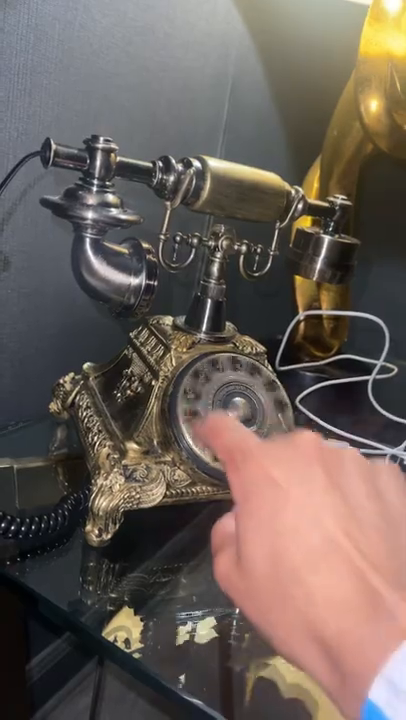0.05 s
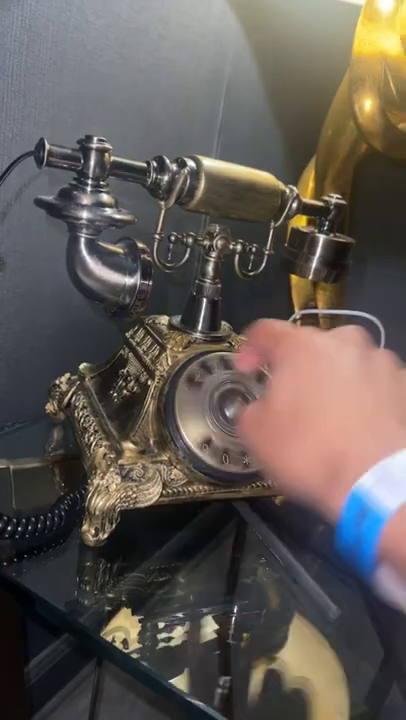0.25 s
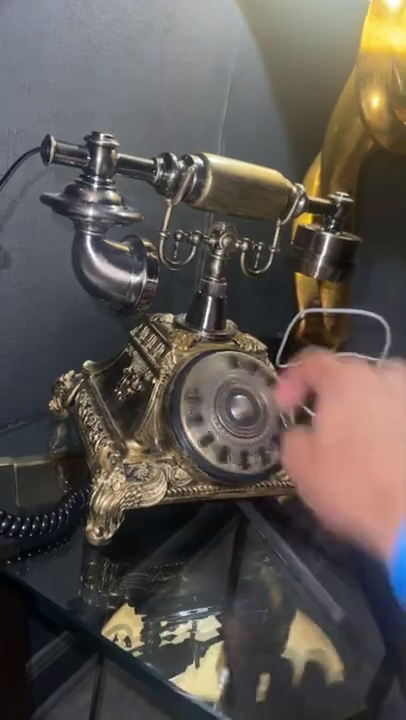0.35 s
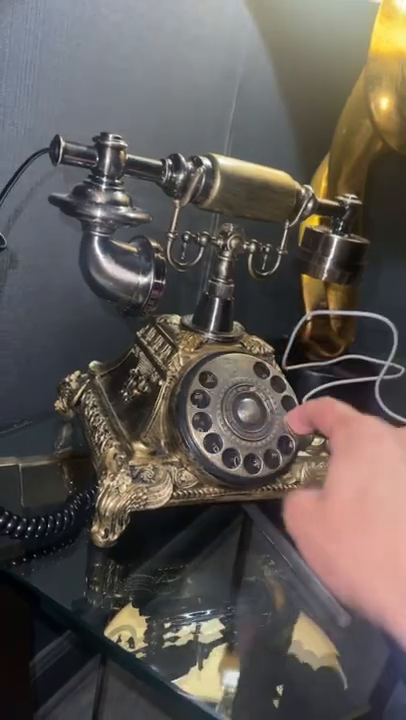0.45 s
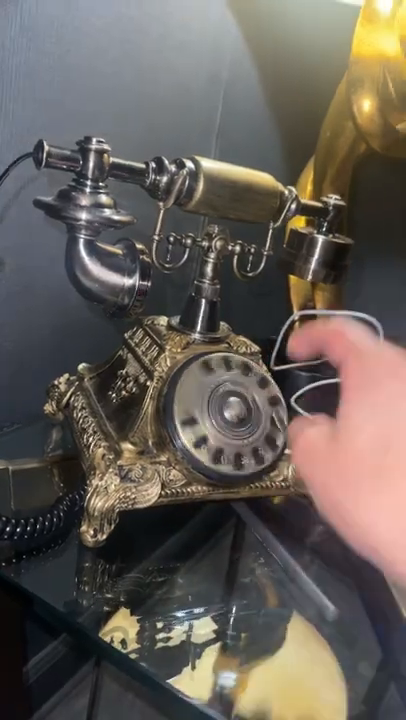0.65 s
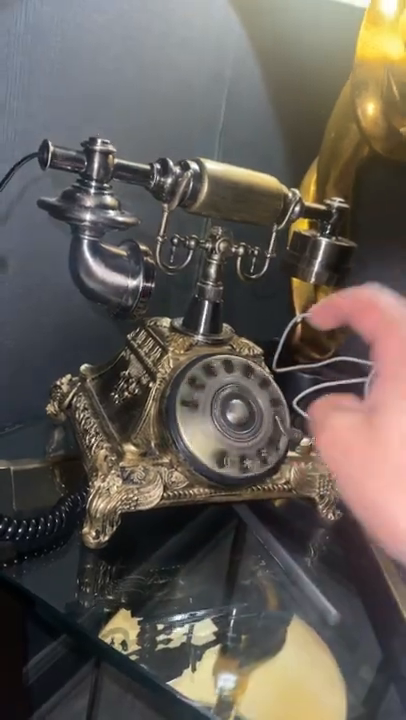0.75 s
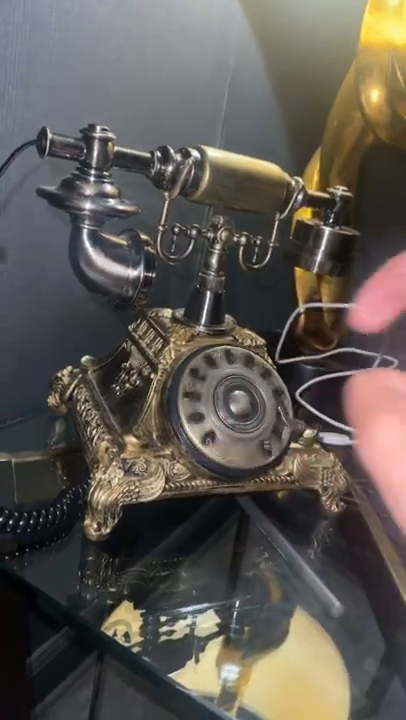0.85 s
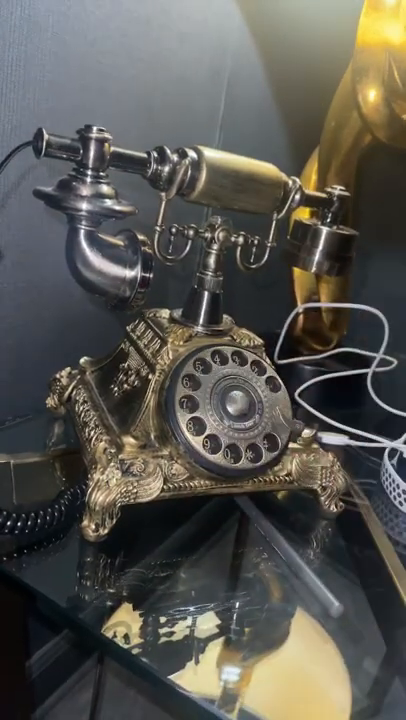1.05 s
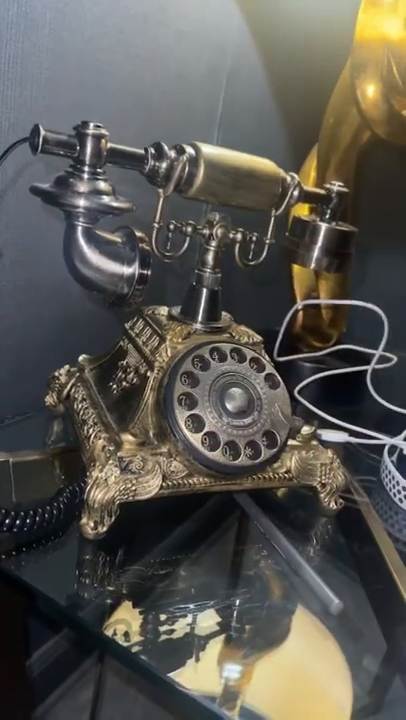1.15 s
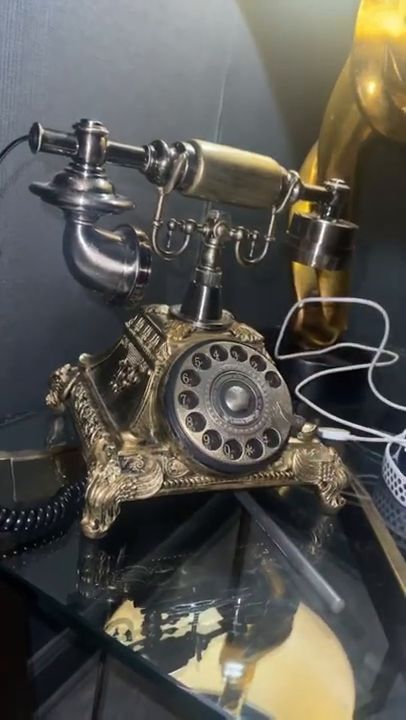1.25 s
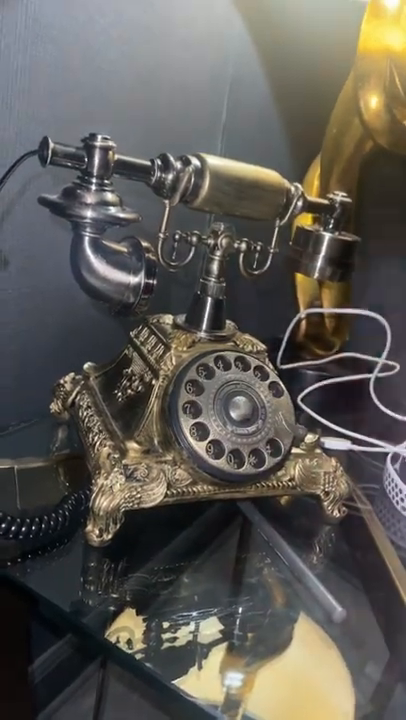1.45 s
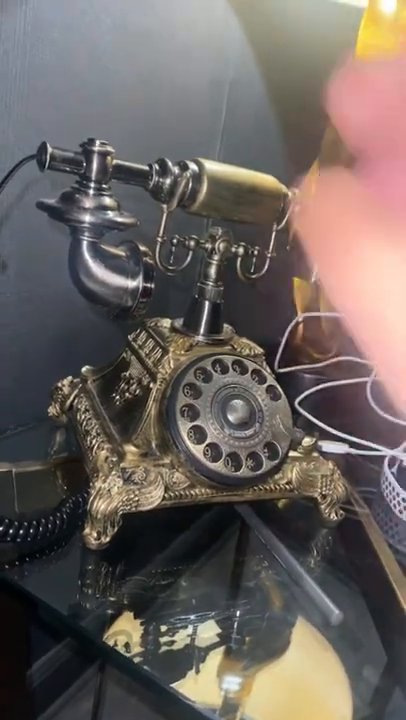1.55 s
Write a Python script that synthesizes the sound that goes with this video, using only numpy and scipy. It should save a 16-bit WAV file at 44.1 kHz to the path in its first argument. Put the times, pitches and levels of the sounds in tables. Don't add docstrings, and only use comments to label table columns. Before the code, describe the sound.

A rotary telephone dial, heard close in a quiet room with low room tone and a faint fading metal ring. From 0.1 to 0.5 seconds a finger winds it, gritty rubbing and irregular clicks swelling, then easing. After a near-silent gap, at 0.63 it whirs back louder, rapid teeth rattling in a hollow metal case over a faint low table drumming. It stops around 1.1, settling by 1.24 as thin, high brass ringing fades.

```python
import sys
import numpy as np
from scipy import signal
from scipy.fft import rfft, irfft
from scipy.io import wavfile
from scipy.ndimage import map_coordinates

SR = 44100
rng = np.random.default_rng(int(sys.argv[2]) if len(sys.argv) > 2 else 0)


def volts_from_db(level):
    exponent = np.asarray(level, float) / 20
    return 10 ** exponent


def persist_wave(psi):
    counts = np.round(np.clip(psi, -1, 1) * 32767).astype(np.int16)
    wavfile.write(sys.argv[1], SR, np.atleast_2d(counts).T)


N = 70560
T_S = np.arange(N) / SR

# (time [s], effort [dB], brightness [dB])
WIND = [
    (.084, -62, 13),
    (.092, -50, -1),
    (.19, -37, -9),
    (.26, -28.5, -4.5),
    (.36, -23.5, -7.5),
    (.47, -26.5, -6.5),
    (.495, -31.5, 5),
    (.512, -48.5, -9.5),
    (.6, -61.5, -14),
]
# (time [s], effort [dB], brightness [dB])
BACK = [
    (0.624, -46, -16),
    (0.643, -26, -5.5),
    (.67, -25, 1),
    (0.748, -22, 1),
    (.88, -21, 1),
    (.93, -25, 3),
    (1., -22, 1.5),
    (1.06, -21.5, -0.5),
    (1.112, -23, 3),
]
# (time [s], effort [dB], brightness [dB])
SETTLE = [
    (1.143, -26.5, -23.5),
    (1.152, -30.5, -19),
    (1.213, -39, -19),
    (1.238, -95, -16),
]
MOVE_START_S, MOVE_END_S = WIND[0][0], SETTLE[-1][0]


def unit(x):
    return x / np.sqrt(np.mean(x ** 2) + 1e-20)


def along(points, hz):
    f, v = np.transpose(points)
    return np.interp(np.log(hz + 1), np.log(f + 1), v)


def wobble(rate_hz):
    return map_coordinates(rng.standard_normal(400), [np.arange(N) * min(rate_hz, 200) / SR])


def causal(gain):
    cepstrum = irfft(np.log(gain(np.fft.rfftfreq(8192, 1 / SR)) + 1e-6))
    cepstrum[1:4096] *= 2
    cepstrum[4097:] = 0
    h = irfft(np.exp(rfft(cepstrum)))[:4096]
    return h / np.linalg.norm(h)


def through(x, h):
    return signal.fftconvolve(x, h)[:N]


def modes(partials, t):
    return sum(volts_from_db(db - 60 * t / t60) * np.sin(2 * np.pi * hz * t) for hz, db, t60 in partials)


def control(column):
    rows = np.array(list(WIND) + list(BACK) + list(SETTLE))
    return np.interp(T_S, rows[:, 0], rows[:, column])


def air():
    # (frequency [Hz], level [dB])
    tone_shape = [(24, -32), (40, 0.5), (346, -9.5), (554, -20.5), (746, -13.5), (1000, -19), (1080, -18),
                  (1170, -19.5), (15000, -74)]
    tone = through(rng.standard_normal(N + 4096), causal(lambda f: volts_from_db(along(tone_shape, f))))
    return volts_from_db(-50.5 + .8 * wobble(6.6)) * unit(tone)


def earlier_ring():
    # (frequency [Hz], level [dB], t60 [s])
    partials = [(3050, -64, 0.2), (3230, -68, .15), (4450, -70, 0.2), (4620, -64, .2), (5240, -72, 0.15),
                (7660, -70, 0.12)]
    return modes(partials, T_S)


def earlier_hiss():
    level_db, t60_s = -62, 0.19
    return volts_from_db(level_db - 60 * T_S / t60_s) * rng.standard_normal(N)


def rubbing():
    grains_per_s, spread_db = 6000, 5
    flutter_db, case_flutter_db = .8, 1.4
    dull_db, bright_db = -2.5, -6.5
    draw = rng.standard_normal((2, N))
    size = volts_from_db(spread_db * np.clip(draw[1], -2, 2))
    grit = unit((rng.random(N) < grains_per_s / SR) * np.sign(draw[0]) * size)
    moving = (T_S > MOVE_START_S) * (T_S < MOVE_END_S)
    force = grit * volts_from_db(control(column=1) + flutter_db * wobble(78)) * moving
    dull = volts_from_db(dull_db + case_flutter_db * wobble(120)) * force
    return dull, volts_from_db(bright_db + control(column=2)) * force


def contacts():
    # (time [s], peak [dB], body [dB], snap [dB], sharp edge [dB])
    pawl = [(0.0869, -29.5, 2, 9, -13.5), (0.138, -28, -2.5, 14, -15), (0.1544, -36, 9, 0.5, -10),
            (0.172, -30, 8, 0, -10), (0.1915, -34.5, 18.5, 2, -17), (0.2029, -28.5, 4.5, 0, -16),
            (0.2095, -23.5, 17, 24, -6.5), (0.2144, -25.5, -1.5, 8, -5), (0.218, -22, 8, 2, -13.5),
            (0.2494, -27, 2.5, -1, -14.5), (0.2557, -15.5, 5, -1.5, -17.5), (0.2616, -20.5, 8.5, 0.5, 3.5),
            (0.268, -28.5, -1, 0.5, 3), (0.283, -27, 3, 0.5, -18.5), (0.29, -20.5, 7, -2, -12),
            (0.2975, -11.5, -5.5, 4, -6), (0.3055, -19, -3, -0.5, 0), (0.3284, -29, 7, 2.5, -8.5),
            (0.348, -23.5, -1.5, -1, 6.5), (0.3547, -14.5, -1, -2, 3), (0.365, -6, -9, -3.5, -18.5),
            (0.3727, -18, -3.5, 6.5, -0.5), (0.3846, -15, -3, -2, -4), (0.3953, -14, -5.5, 3, 0.5),
            (0.402, -14, 5.5, -3.5, 0.5), (0.411, -22, 4, 1.5, 6), (0.4226, -28.5, 8, 1, -1.5),
            (0.4304, -16.5, 6.5, 2.5, -1), (0.445, -26.5, -6.5, 1.5, 11), (0.4505, -23.5, -1, -1.5, -1.5),
            (0.463, -11.5, 7.5, 5, 1.5), (0.4745, -21, -0.5, -5.5, -6.5), (0.484, -22.5, 13.5, -2, -11),
            (0.497, -19, 11, 3, -7.5), (0.5224, -41, 12, 2.5, -11.5), (0.5403, -28.5, 9.5, 2, -13.5),
            (0.546, -33, 10, 0, -13), (0.6015, -38.5, 5, 2, -13)]
    # (time [s], peak [dB], body [dB], snap [dB], sharp edge [dB])
    teeth = [(0.633, -30, 18, 2, -19), (0.6415, -12, -7, 4.5, 0.5), (0.646, -12, 7, 4.5, -2),
             (0.652, -21, -2.5, 1, -3.5), (0.6624, -21.5, 3.5, 3.5, -3), (0.6785, -9, -3, 2, -4),
             (0.7046, -11, -5, 0.5, 2.5), (0.7291, -6, 3, 9, 1), (0.7515, -4, -3, 5.5, -4),
             (0.7771, -8, -4.5, 6.5, -3.5), (0.7964, -19.5, 4, -1, -5), (0.804, -21.5, 3, 5.5, -4.5),
             (0.8284, -9.5, -8.5, 6, -7), (0.851, -12, 10, 5, -2.5), (0.8714, -16, 10.5, 3, 1.5),
             (0.8762, -11, 5, 1.5, -0.5), (0.9005, -8.5, 5, 1, 1), (0.9424, -19.5, 2.5, 1.5, -0.5),
             (0.9558, -16, 9.5, 10, -4), (0.979, -6, 6.5, 4, -3), (1.0025, -5, 0.5, -7, 3),
             (1.0264, -16, 3.5, 1.5, 1), (1.0474, -23, -2, 1, -3), (1.0735, -8.5, -4, 0, -7.5),
             (1.0795, -11.5, 10.5, -0.5, -5.5), (1.0984, -5.5, 0, 1, -10), (1.103, -0.5, -7, 3.5, -17),
             (1.109, -11.5, -12, 7.5, -12.5), (1.1362, -19.5, 9, -3.5, 1.5), (1.141, -20, 0, -0.5, -17.5),
             (1.1564, -35, 11, 4, -10), (1.183, -32, 18, -3, -10), (1.193, -39, 20, -2, -14),
             (1.2094, -34.5, 18.5, 5, -14), (1.217, -49, 8, 0, -14), (1.3319, -53.5, 26, -4, -9.5),
             (1.4294, -61, 3.5, 3, 1)]
    knock_db, knock_s, knock_rise_s = -4, .0045, .001
    scrape_db, scrape_s, scrape_rise_s = -6, .0024, .0005
    edge_hz, edge_s = 6100, 0.0033
    dull, bright, edge = np.zeros((3, N + SR))
    t = np.arange(2000) / SR
    knock_env = np.exp(-t / knock_s) * (1 - np.exp(-t / knock_rise_s))
    for time_s, db, body_db, snap_db, edge_db in list(pawl) + list(teeth):
        noise = volts_from_db(scrape_db) * np.clip(rng.standard_normal(len(t)), -2, 2)
        scrape = (1 - np.exp(-t / scrape_rise_s)) * noise
        snap = volts_from_db(min(snap_db, 9))
        scrape[30] += snap
        noise[5] += snap
        at = round(time_s * SR)
        dull[at:][:len(t)] += volts_from_db(db + body_db + knock_db) * scrape * knock_env
        bright[at:][:len(t)] += volts_from_db(db) * scrape * np.exp(-t / scrape_s)
        edge[at + 25:][:len(t)] += volts_from_db(db + edge_db) * noise * np.exp(-t / edge_s)

    def split(x, side):
        return signal.sosfilt(signal.butter(3, edge_hz, side, fs=SR, output="sos"), x[:N])

    return dull[:N], split(bright, "low") + split(edge, "high")


def pings():
    pings_per_s, level_db = 700, -6
    center_hz, pitch_spread, decay_cycles = 6150, 0.55, 6.7
    draw = rng.standard_normal((3000, 2))
    at_s = np.cumsum(rng.exponential(1, 3000)) / pings_per_s
    pitch_hz = center_hz * np.exp(pitch_spread * draw[:, 0])
    keep = (at_s > MOVE_START_S) & (at_s < MOVE_END_S) & (pitch_hz < 10300)
    start = (at_s[keep] * SR).astype(int)
    hz = np.clip(pitch_hz[keep], 1500, 15000)[:, None]
    t = np.arange(400) / SR
    drive_db = (control(column=1) + control(column=2))[start]
    size = volts_from_db(drive_db + level_db + 4 * np.clip(draw[keep, 1], -2, 2))
    ring = size[:, None] * np.sin(2 * np.pi * hz * t) * np.exp(-t * hz / decay_cycles)
    return np.bincount((start[:, None] + np.arange(len(t))).ravel(), ring.ravel(), N + 400)[:N]


def hollow_case(dull):
    # (frequency [Hz], width [Hz], level [dB])
    resonances = [(1404, 48, -0.5), (1490, 66, -11.5), (1510, 120, -7.5), (1706, 30, -15.5),
                  (1848, 48, 0.5), (2074, 65, -4.5), (2273, 69, -3.5), (2887, 120, -6), (3235, 240, -6.5),
                  (4330, 160, -18)]
    # (frequency [Hz], level [dB])
    floor = [(900, -39.5), (1340, -9.5), (1420, 4), (2600, -16.5), (3600, -11), (4300, -23), (8000, -46),
             (11000, -87.5)]
    shift, rocks_per_s = .005, 30

    def peaks(f):
        power = sum(volts_from_db(2 * db) / (1 + ((f - c) / w * 2) ** 4) for c, w, db in resonances)
        return np.sqrt(power + volts_from_db(2 * along(floor, f)))

    rock = np.pi / 4 * (1 + np.tanh(2 * wobble(rocks_per_s)))
    up = through(dull * np.cos(rock), causal(lambda f: peaks(f * (1 + shift))))
    down = through(dull * np.sin(rock), causal(lambda f: peaks(f * (1 - shift))))
    return up + down


def heavy_base(dull):
    # (frequency [Hz], level [dB])
    base_shape = [(280, -50), (470, -1), (600, 0.5), (1200, 6), (1500, -34.5)]
    return through(dull * volts_from_db(-12.5 + control(column=2)), causal(lambda f: volts_from_db(along(base_shape, f))))


def bare_metal(bright):
    # (frequency [Hz], level [dB])
    sheen = [(1470, -22.5), (2500, -4), (2990, 7.5), (3840, -2), (4710, -2), (7770, -12), (9450, -5.5),
             (11400, -21.5), (16200, -26)]
    top_hz, top_grows_db_per_db, full_effort_db = 11000, 0.61, -26.5
    metal = through(bright, causal(lambda f: volts_from_db(along(sheen, f) - 38.2 * np.clip(1 - f / 2500, 0, 1))))
    top = signal.sosfiltfilt(signal.butter(8, top_hz, "high", fs=SR, output="sos"), metal)
    excess_db = control(column=1) + control(column=2) - full_effort_db
    return metal + top * (volts_from_db(top_grows_db_per_db * excess_db) - 1)


def telephone():
    dull, bright = np.add(rubbing(), contacts())
    metal = bare_metal(bright + earlier_hiss())
    return hollow_case(dull) + heavy_base(dull) + metal + pings()


def room(x):
    # (frequency [Hz], t60 [s])
    wall_t60 = [(500, 0.7), (1400, .3), (2500, 0.42), (6000, 0.4), (9800, .3), (11000, 0.1)]
    hz, t, z = signal.stft(rng.standard_normal(SR // 2), SR, nperseg=256)
    tail = signal.istft(z * volts_from_db(-60 * t / along(wall_t60, hz)[:, None]), SR, nperseg=256)[1]
    return through(x, np.pad(tail, (400, 0)) / np.linalg.norm(tail))


def table():
    center_hz, width_hz, level_db = 94.7, 44.3, -26
    lag_s, lumps_db = 0.035, 3
    time_s, effort_db, _ = np.transpose(list(BACK) + list(SETTLE))
    late_db = np.interp(T_S - lag_s, time_s, effort_db, left=-120, right=-120)
    shake = volts_from_db(late_db + lumps_db * wobble(12))
    drum = causal(lambda f: 1 / (1 + ((f - center_hz) / width_hz * 2) ** 2))
    return through(volts_from_db(level_db) * shake * rng.standard_normal(N), drum)


def brass():
    # (frequency [Hz], level [dB], t60 [s])
    partials = [(2030, -62, .45), (2692, -68, .45), (3013, -61, 1.6), (3019, -67, 1.4), (4527, -58, .33),
                (4818, -43, .6), (9954, -57, .5), (14290, -57, .25)]
    stop_s, rise_s = 1.099, .008
    after_s = np.clip(T_S - stop_s, 0, None)
    return modes(partials, after_s) * (1 - np.exp(-after_s / rise_s))


def scene():
    phone = telephone()
    return (air() + earlier_ring() + phone + volts_from_db(-16.5) * room(phone) + table() + brass())[None]


def top_cut(x):
    return signal.sosfilt(signal.butter(12, 16480, fs=SR, output="sos"), x)


def record(dry):
    cut = signal.sosfilt(signal.butter(4, 52, "high", fs=SR, output="sos"), dry)
    cut = signal.sosfilt(signal.cheby2(12, 60, 16600, fs=SR, output="sos"), cut)
    return top_cut(cut)


dry = scene()
out = record(dry)
persist_wave(out)
```